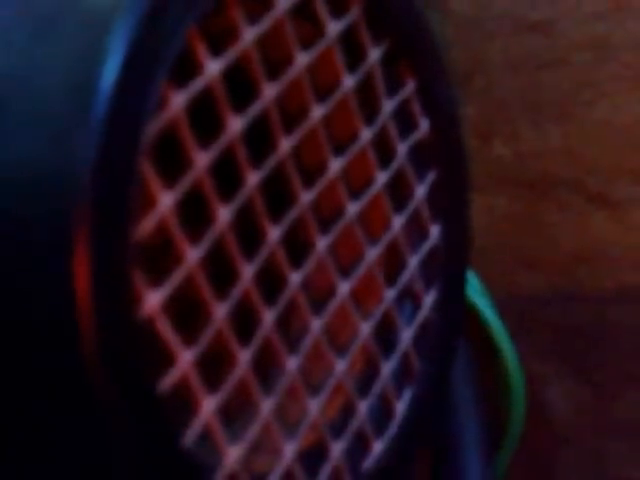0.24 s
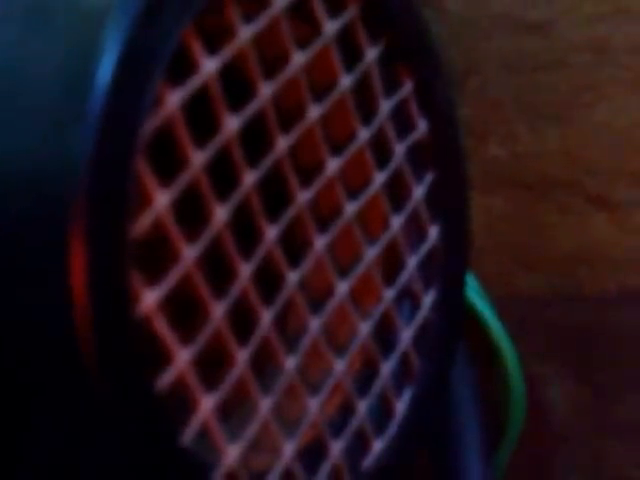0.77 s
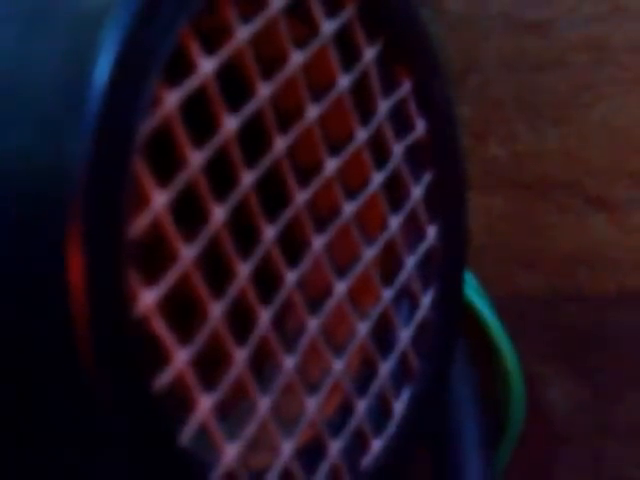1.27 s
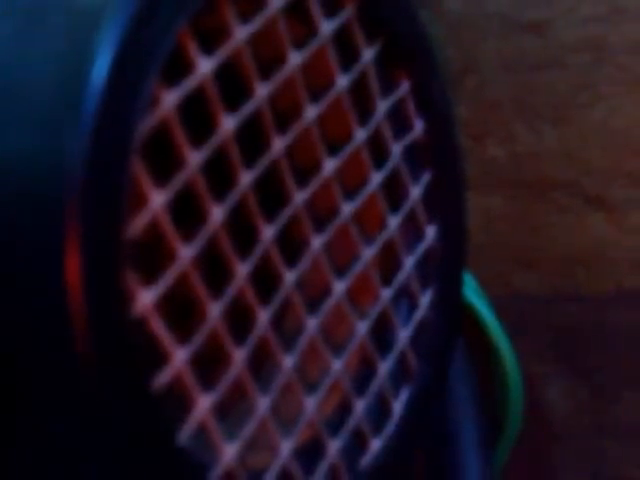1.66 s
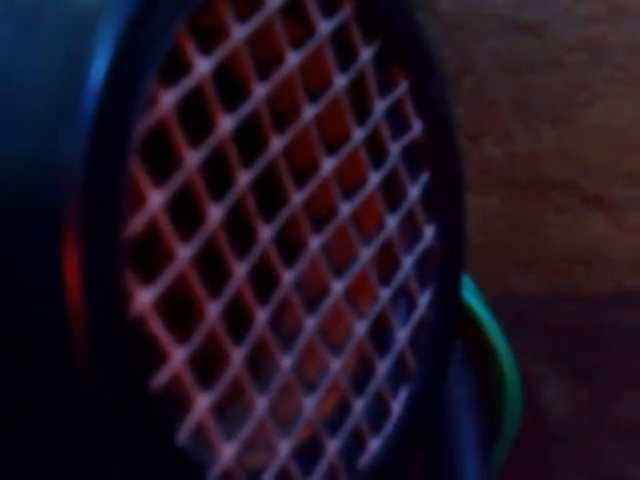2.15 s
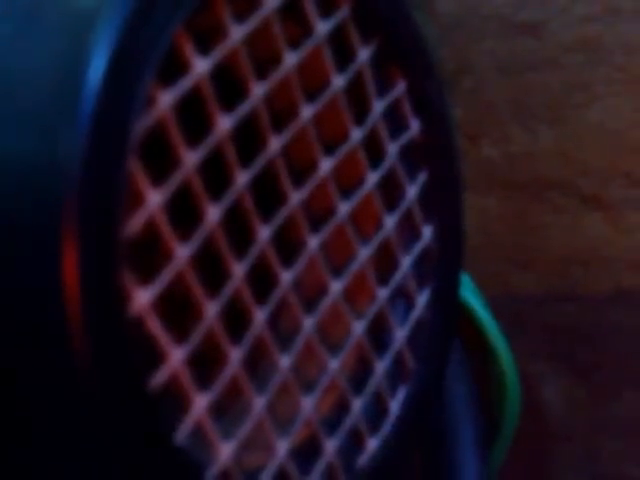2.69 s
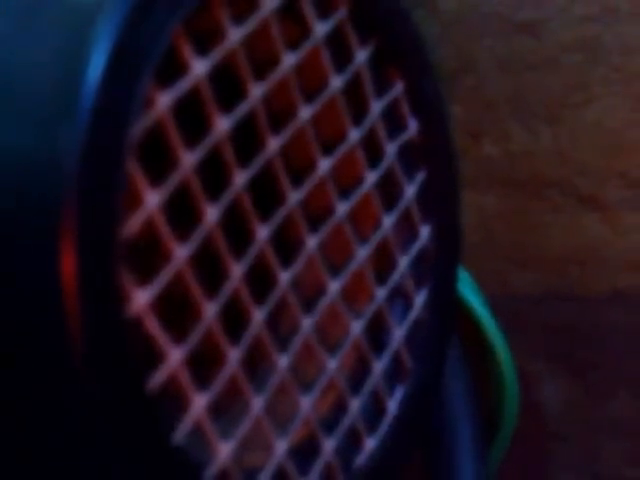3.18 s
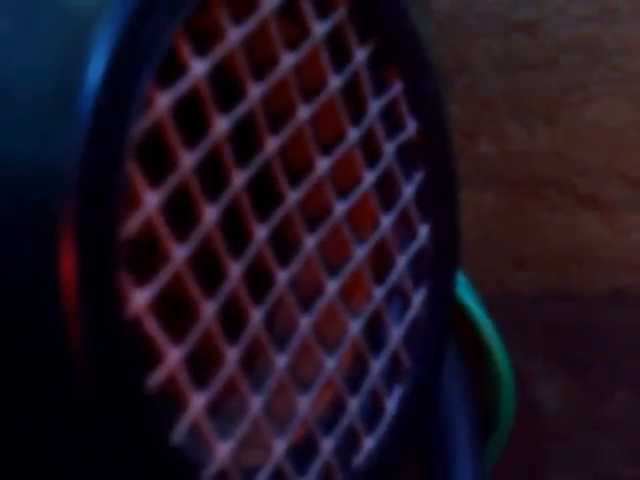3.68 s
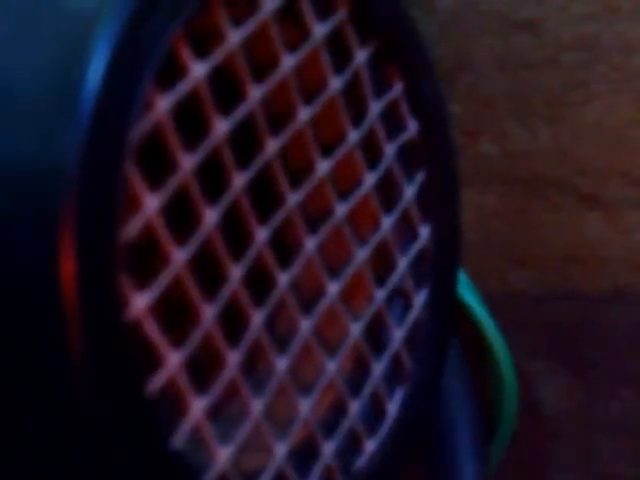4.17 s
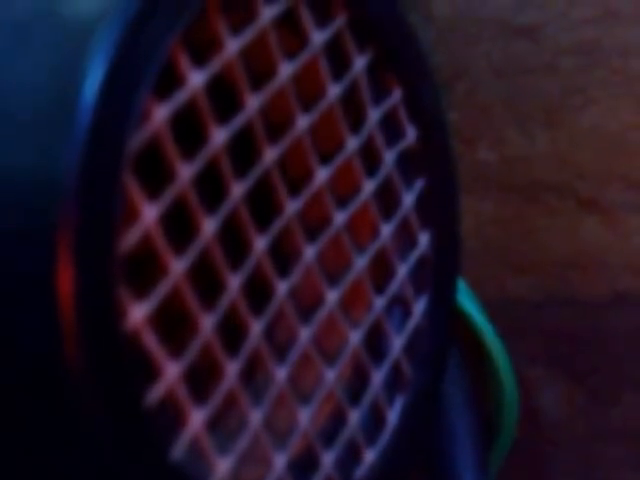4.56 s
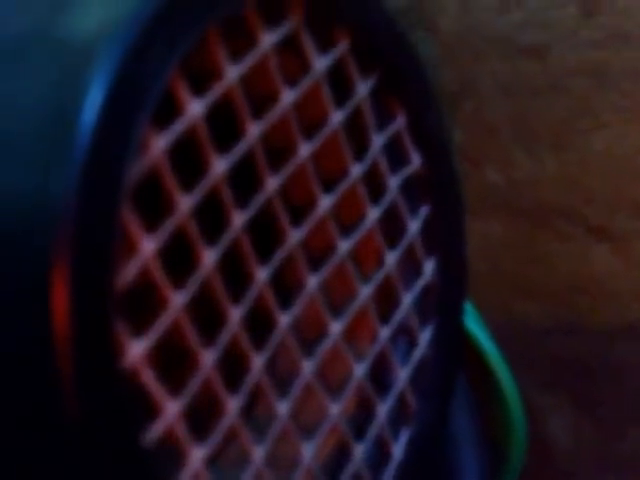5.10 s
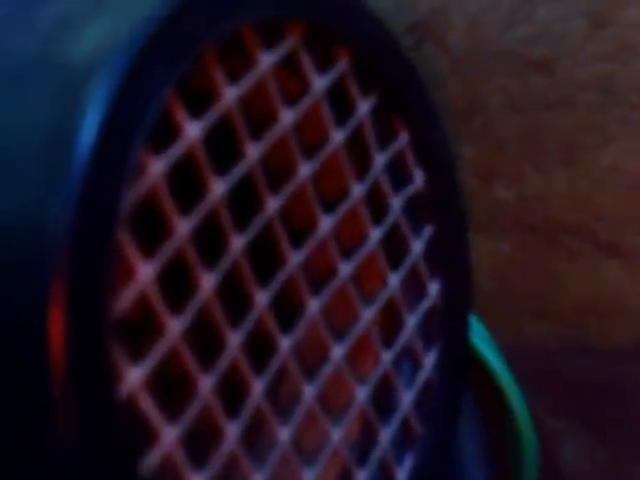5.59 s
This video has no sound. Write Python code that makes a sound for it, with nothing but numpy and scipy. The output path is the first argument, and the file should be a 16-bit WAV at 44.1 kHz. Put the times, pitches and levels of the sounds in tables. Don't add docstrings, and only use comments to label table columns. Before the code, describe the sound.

Close, fairly quiet fan whir with a fast scratchy tick, rushing air, low machine hum underneath and occasional dull knocks on the microphone.

```python
import sys
import numpy as np
from scipy import signal
from scipy.fft import rfft, irfft
from scipy.io import wavfile

SR = 44100
rng = np.random.default_rng(int(sys.argv[2]) if len(sys.argv) > 2 else 0)


def unload_audio(sound):
    columns = np.transpose(np.atleast_2d(sound))
    steps = np.round(np.clip(columns, -1, 1) * 32767)
    wavfile.write(sys.argv[1], SR, steps.astype(np.int16))


def amplitude_ratio(level_db):
    exponent = np.asarray(level_db, float) / 20
    return 10 ** exponent


N = 257544
TIME_S = np.arange(N) / SR
PULSES_PER_TURN, TURNS_PER_S = 21, 10.1
TURN_S = 1 / TURNS_PER_S

# [t/s into the turn, pressure/dB, bright sizzle/dB]
RUB = [(0, -3, -4), (.010, -4, -5), (.017, 0, 0), (.028, -1, 0), (.036, -3, -2), (.050, -4, -4),
       (.058, -2, -2), (.075, 0, -4), (.088, -1, -5), (.099, -3, -4)]
# [t/s, level/dB, length/s]
GUSTS = [
    (.8, -65, 2.26),
    (2.35, -65.5, 0.81),
]


def rms_one(x):
    return x / np.sqrt(np.mean(x ** 2) + 1e-20)


def drift(rate_hz, rows):
    r = np.exp(-80 * np.pi * rate_hz / SR)
    noise = rng.standard_normal((rows, N // 40 + 2002))
    slow = signal.lfilter([1], [1, -2 * r, r * r], noise)[:, 2000:]
    slow = slow / slow.std(axis=1, keepdims=True)
    return np.repeat(slow, 40, axis=1)[:, :N]


def after(start_s, lag_s):
    return 1 - np.exp(-np.maximum(TIME_S - start_s, 0) / lag_s)


def swell(center_s, length_s):
    return np.cos(np.pi * np.clip((TIME_S - center_s) / length_s, -.5, .5)) ** 2


def tone(hz, level_db):
    cycles = np.cumsum(hz * np.ones(N)) / SR + rng.random()
    return np.sqrt(2) * amplitude_ratio(level_db) * np.sin(2 * np.pi * cycles)


def resonance(x, hz, width_hz):
    r = np.exp(-np.pi * width_hz / SR)
    poles = [1, -2 * r * np.cos(2 * np.pi * hz / SR), r * r]
    return signal.lfilter([(1 - r * r) / 2, 0, (r * r - 1) / 2], poles, x)


def electric_whine():
    # [f/Hz, level/dB rms]
    lines = [(15518, -93), (15588, -90), (15659, -84), (15729, -84)]
    wavers = drift(7.6, rows=len(lines))
    return sum(tone(hz, db - 3.5 + 5.5 * waver) for (hz, db), waver in zip(lines, wavers))


def slowing():
    starts_s, length_s = 2.45, 0.457
    return np.clip((TIME_S - starts_s) / length_s, 0, 1)


def drone():
    # [t/s, change/dB, length/s]
    falters = [
        (0, -14, 0.22),
        (0.88, -9, 0.57),
        (1.4, 2, .7),
        (2.3, -5.5, 1.2),
        (2.736, 4, 0.38),
        (3.5, 3, 1.0),
        (4.18, -7.5, 0.31),
    ]
    fast_hz, slow_hz = 63.13, 48.5
    drone_db, slow_drone_db, octave_db, slow_octave_db = -55, -58.5, -58.5, -71
    slowed = slowing()
    hz = fast_hz + (slow_hz - fast_hz) * slowed
    change_db = sum(db * swell(s, length_s) for s, db, length_s in falters) + drift(3, rows=1)[0]
    low = tone(hz, drone_db + (slow_drone_db - drone_db) * slowed + change_db)
    octave = tone(2 * hz, octave_db + (slow_octave_db - octave_db) * slowed + change_db)
    return low + octave


def hums():
    hum_hz, hum_db, rise_db = 78.7, -59.5, 6
    sag_hz, swell_db = 1.4, 2.5
    sagged = after(4.55, lag_s=0.13)
    hum = tone(hum_hz - sag_hz * sagged, hum_db + rise_db * slowing() + swell_db * sagged)
    # [t/s, level/dB, length/s]
    faint_swells = [
        (2.2, -70.5, 6),
        (4.7, -66.5, 0.76),
    ]
    return hum + tone(171.1, 0) * sum(amplitude_ratio(db) * swell(s, length_s) for s, db, length_s in faint_swells)


def hand_bumps():
    # [t/s, peak/dB, f/Hz]
    hits = [
        (.75, -52, 55),
        (1.168, -38, 70),
        (1.278, -41, 85),
        (3.22, -45, 290),
        (.7, -54, 310),
        (1.85, -50, 70),
        (3.653, -36, 85),
        (4.47, -50, 55),
        (5.75, -48, 35),
        (3.3, -49, 33),
    ]
    out = np.zeros(N + SR)
    for s, level_db, hz in hits:
        t = np.arange(round(2.3 / hz * SR)) / SR
        start = round((s - .25 / hz) * SR)
        decay = np.exp(-t * hz * 1.1) * (1 - t / t[-1])
        out[start:start + len(t)] += amplitude_ratio(level_db) * np.sin(2 * np.pi * hz * t) * decay
    return out[:N]


def duct():
    duct_hz, width_hz, duct_db = 860, 70, -63
    edges_hz = [duct_hz - width_hz, duct_hz + width_hz / 2]
    band = signal.butter(3, edges_hz, "band", fs=SR, output="sos")
    note = rms_one(signal.sosfilt(band, rng.standard_normal(N)))
    return (amplitude_ratio(duct_db) + sum(amplitude_ratio(db) * swell(s, length_s) for s, db, length_s in GUSTS)) * note


def grille_air():
    # [f/Hz, density/dB per Hz]
    spectrum = [(15, -17), (32, -9), (42, -8.5), (60, -2), (110, -8.5), (250, -9), (500, -17), (1000, -22),
                (1700, -25.5), (3000, -25), (6500, -30), (9000, -31.5), (16000, -33.5)]
    level_db, gust_lift_db, flutter_db = -55, 1, 1.33
    f, density_db = np.transpose(spectrum)
    hz = np.maximum(np.arange(N // 2 + 1) * SR / N, 1)
    colour = amplitude_ratio(np.interp(np.log(hz), np.log(f), density_db))
    noise = rms_one(irfft(rfft(rng.standard_normal(N)) * colour, N))
    gusting = sum(swell(s, length_s) for s, _, length_s in GUSTS)
    return amplitude_ratio(level_db + gust_lift_db * gusting + flutter_db * drift(6, rows=1)[0]) * noise


def casing(x):
    # [f/Hz, width/Hz]
    modes = [(732, 30), (850, 70), (1259, 60), (1390, 70), (1970, 30), (2314, 70), (2508, 35), (2583, 50),
             (2960, 45), (3283, 22), (3500, 130), (3789, 55), (4270, 120), (4510, 150), (4737, 60),
             (4823, 80), (5135, 50), (5351, 60), (5490, 200), (5803, 64), (6070, 170), (6686, 50),
             (7800, 400), (8527, 250), (10900, 1200)]
    modes_db = [-4, -8, -8, -4, -9.5, -9, -4.5, -4.5, -12, 2.5, -7, -1.5, -2, -1, -5.5, -11, 0.5, -3, -6,
                -1.5, -5, -7.5, -12.5, -16, -20]
    out = np.zeros(N)
    for k, ((hz, width_hz), db) in enumerate(zip(modes, modes_db)):
        out += (-1) ** k * amplitude_ratio(db) * resonance(x, hz, width_hz)
    return out


def drive_load():
    starts_s = [
        -.398,
        2.451,
        5.469,
    ]
    length_s, inertia_s = .8176, .413
    return sum(after(s, inertia_s) - after(s + length_s, inertia_s) for s in starts_s)


def drive_tones(turn_hz, load):
    # [multiple of the turn, level/dB rms]
    orders = [(7, -67.5), (14, -72), (20, -95), (21, -59), (22, -70.5), (28, -70), (35, -79.5)]
    loaded_db, wobble_db = -3.5, 0.51
    wobbles = drift(0.75, rows=len(orders))
    return sum(tone(k * turn_hz, db + loaded_db * load + wobble_db * wobble)
               for (k, db), wobble in zip(orders, wobbles))


def surface_noise(turns):
    cells, stages, wear, fresh_db = 4360, 8, .4, 1
    surfaces = rng.standard_normal((stages, cells))
    cell = (turns % 1 * cells).astype(int)
    surface = np.sum(surfaces[:, cell] * (1 + wear * drift(0.62, rows=stages)), axis=0)
    return rms_one(surface) + amplitude_ratio(fresh_db) * rng.standard_normal(N)


def rubs(turns):
    into_s = turns % 1 * TURN_S
    s, press_db, sizzle_db = np.transpose(RUB)
    rough = surface_noise(turns)
    body = casing(rough * amplitude_ratio(np.interp(into_s, s, press_db)))
    high_pass = signal.butter(2, 8500, "high", fs=SR, output="sos")
    sizzle = signal.sosfilt(high_pass, rough * amplitude_ratio(1.75 * np.interp(into_s, s, sizzle_db)))
    return amplitude_ratio(-3.0) * rms_one(body) + amplitude_ratio(-13.5) * rms_one(sizzle)


def grit():
    # [f/Hz, grains, level/dB where the rub is hardest]
    rings = [(2600, 2, -54), (3500, 5, -55), (4700, 6, -54), (5700, 9, -53), (7650, 6, -58),
             (10950, 2, -58)]
    pitch_spread, vary_db = .04, 2.5
    s, press_db, sizzle_db = np.transpose(RUB)
    rows = []
    for hz, grains, level_db in rings:
        for k, (place, pitch, size) in enumerate(rng.uniform(-1, 1, (grains, 3))):
            at_s = (k + .5 + place / 2) / grains * TURN_S
            rub_db = np.interp(at_s, s, sizzle_db if hz > 7000 else press_db)
            rows.append((at_s, hz * (1 + pitch_spread * pitch), level_db + rub_db + vary_db * size))
    return rows


def bursts(turns, rows, pace, vary_db):
    out, into_s = np.zeros(N), turns % 1 * TURN_S
    for (s, hz, level_db, length_s), slow in zip(rows, drift(1.0, rows=len(rows))):
        gap_s = (into_s - s + TURN_S / 2) % TURN_S - TURN_S / 2
        on = np.abs(gap_s) < length_s / 2
        window = np.cos(np.pi * gap_s[on] / length_s) ** 2
        ring = np.sin(2 * np.pi * hz * gap_s[on] / pace[on])
        out[on] += amplitude_ratio(level_db + vary_db * slow[on]) * window * ring
    return out


def contacts(turns, pace):
    # [t/s into the turn, f/Hz, peak/dB]
    hard = [(.0035, 4650, -51), (.0069, 4480, -51), (.0146, 5600, -51), (.0188, 5510, -46),
            (.0208, 4570, -47), (.0218, 5600, -47), (.0233, 4570, -41), (.0238, 5000, -50),
            (.0252, 2580, -50), (.0287, 4480, -47), (.045, 5680, -50), (.0545, 5510, -50),
            (.0584, 4740, -45), (.0594, 3530, -51), (.0639, 5770, -51), (.0663, 5940, -50),
            (.0683, 4480, -49), (.0748, 4650, -43), (.0767, 5680, -50), (.0772, 3270, -48),
            (.0797, 4570, -38), (.0822, 5940, -51), (.0866, 4820, -47), (.0896, 4650, -49),
            (.0985, 4390, -43), (.0173, 10850, -59), (.0223, 7920, -53), (.0238, 11020, -57),
            (.0252, 7840, -56), (.0277, 7410, -59)]
    # [t/s into the turn, f/Hz, peak/dB, length/s]
    long_knocks = [(.024, 840, -55, .008), (.077, 840, -57, .008), (.097, 840, -55, .008),
                   (.020, 1960, -62, .007), (.034, 1960, -58, .02), (.074, 1960, -60, .008),
                   (.088, 1960, -62, .007), (.095, 2500, -56, .012), (.070, 3270, -57, .044),
                   (.078, 3363, -62, .03), (.025, 3260, -62, .02)]
    into_s = turns % 1 * TURN_S
    tick_rows = [row + (.0055,) for row in hard + grit()]
    struck = bursts(turns, tick_rows, pace, vary_db=1.8)
    early = (into_s > .01) & (into_s < .066)
    struck = struck * amplitude_ratio(120 * (pace - 1.006) * early)
    struck = struck + bursts(turns, long_knocks, np.ones(N), vary_db=1.5)
    return amplitude_ratio(52.5) * (amplitude_ratio(-6.5) * struck + amplitude_ratio(-5.5) * casing(struck))


def blower_drive():
    free_hz, drag_hz = 213.8, 8.073
    rub_db, rub_loaded_db = -52.5, -0.5
    load = drive_load()
    turn_hz = (free_hz - drag_hz * load) / PULSES_PER_TURN
    turns = np.cumsum(turn_hz) / SR
    rough = rubs(turns) + contacts(turns, pace=turn_hz / TURNS_PER_S)
    return amplitude_ratio(rub_db + rub_loaded_db * load) * rough + drive_tones(turn_hz, load)


def scene():
    background = electric_whine() + drone() + hums() + hand_bumps()
    flow = grille_air() + amplitude_ratio(-4.0) * duct()
    mono = background + flow + blower_drive()
    return np.array([mono, mono])


def roll_off(x):
    return signal.sosfilt(signal.butter(12, 16630, fs=SR, output="sos"), x)


def record(dry):
    hiss_db, cutoff_hz, offset = -66.5, 15770, .0003
    hissy = dry + amplitude_ratio(hiss_db) * rng.standard_normal(N)
    low_pass = signal.ellip(12, .5, 60, cutoff_hz, fs=SR, output="sos")
    mix = signal.sosfilt(low_pass, hissy) + offset
    return roll_off(mix)


dry = scene()
out = record(dry)
unload_audio(out)
```